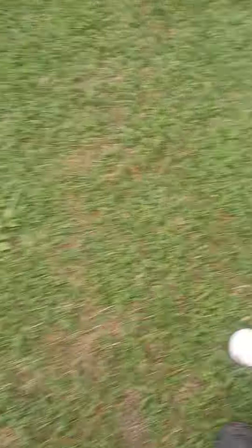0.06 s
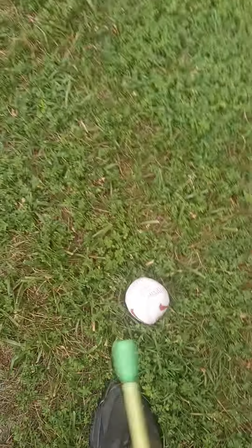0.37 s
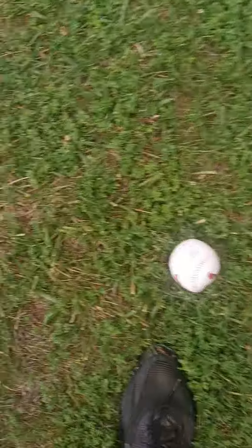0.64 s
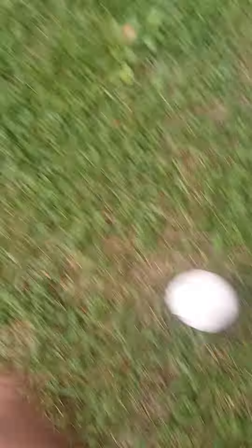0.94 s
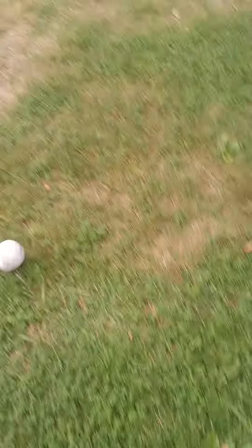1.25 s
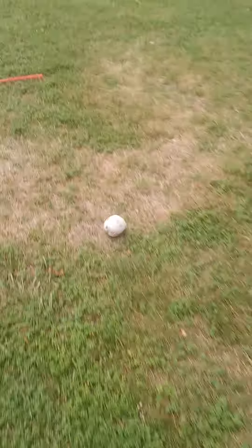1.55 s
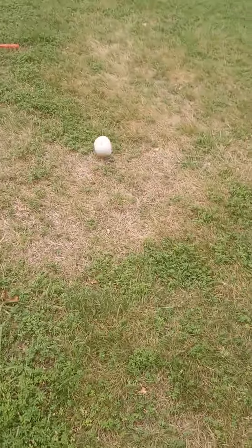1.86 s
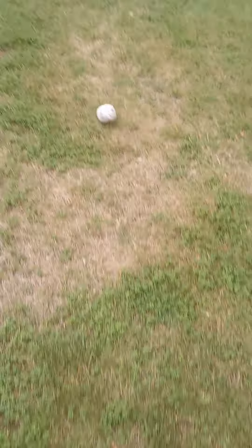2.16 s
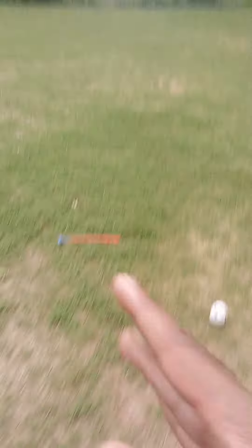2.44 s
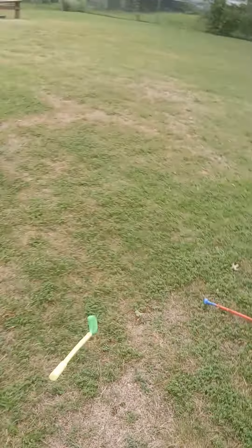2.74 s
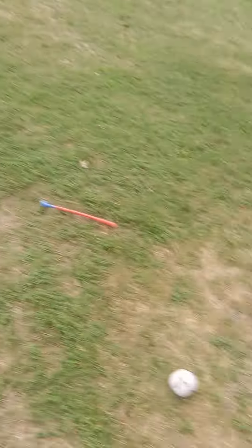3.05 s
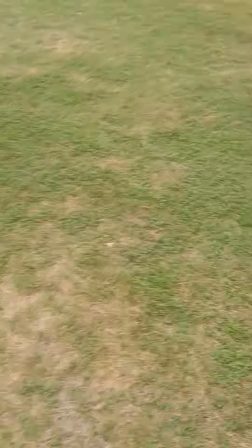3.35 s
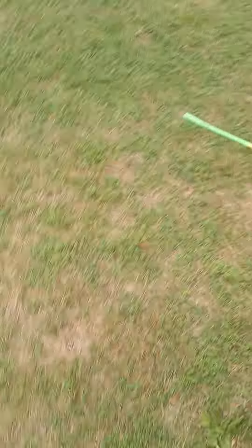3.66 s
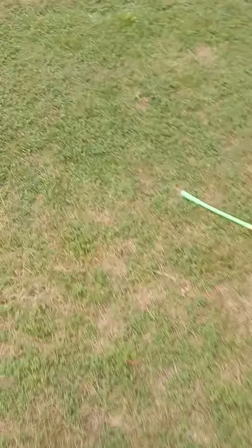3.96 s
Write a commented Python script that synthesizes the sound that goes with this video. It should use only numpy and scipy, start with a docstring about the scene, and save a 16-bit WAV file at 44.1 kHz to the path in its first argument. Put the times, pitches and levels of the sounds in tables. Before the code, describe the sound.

A hollow plastic toy club strikes a ball with a sharp click and a dull knock at about 1 second. Birds whistle and chirp for most of the first three seconds, over a thin insect hiss and low rumble. Soft steps crush the grass, with tiny snaps just after 2 seconds. The club drops with a soft thud at 3 seconds, and wind buffets the microphone around 3.5 seconds.

```python
"""Toy club on a lawn

A hollow plastic toy club swishes through grass, clicks against a ball and later drops on the lawn.
Soft steps crush the grass while songbirds whistle and chip among echoing trees, over a thin insect hiss.
A low rumble runs throughout, and near the end puffs of wind buffet the microphone."""
import sys
import numpy as np
from scipy import signal
from scipy.fft import rfft, irfft, next_fast_len
from scipy.io import wavfile
from scipy.ndimage import uniform_filter1d, map_coordinates

SR = 44100
rng = np.random.default_rng(int(sys.argv[2]) if len(sys.argv) > 2 else 0)


def wav_record(signal):
    """Record a signal, one row per channel, as 16-bit PCM in the file named by sys.argv[1]."""
    frames = np.transpose(np.atleast_2d(signal))
    bounded = np.clip(frames, -1, 1)
    # unit amplitude maps onto the largest positive 16-bit level
    quanta = np.round(bounded * 32767).astype(np.int16)
    wavfile.write(sys.argv[1], SR, quanta)


N = 176400
PATCH_DB = 2.5  # how much the tone of a noise drifts
CLICK_RISE_S = 0.0003


def amp(db):
    """Turn decibels into a gain."""
    return 10 ** (np.asarray(db) / 20)


def unit(x):
    """Scale a signal to an average power of 1."""
    return x / np.sqrt(np.mean(x ** 2) + 1e-20)


def clock(samples=N):
    """The time of each sample, in seconds."""
    return np.arange(samples) / SR


def along(points, hz):
    """Read between (frequency, value) points, spacing the pitches by octaves."""
    f, v = np.transpose(points)
    return np.interp(np.log(hz + 1), np.log(f + 1), v)


def wobble(rate):
    """A smooth random curve through `rate` new values a second."""
    return map_coordinates(rng.standard_normal(int(N * rate / SR) + 4), [np.arange(N) * rate / SR])


def filtered(x, response):
    """Turn each frequency up or down by the gain response(hz)."""
    size = next_fast_len(N + SR // 2)
    return irfft(rfft(x, size) * response(np.fft.rfftfreq(size, 1 / SR)), size)[:N]


def noise(colour, grain_db=0, patchy_db=0):
    """Noise with a colour (its balance of low and high), clumped into grains and drifting patches."""
    grains = amp(grain_db * np.clip(wobble(900), -2, 2))
    spectrum = signal.stft(rng.standard_normal(N) * grains, nperseg=512)[2]
    patches = uniform_filter1d(rng.standard_normal(spectrum.shape), size=3, axis=0)
    patches = uniform_filter1d(patches, size=14, axis=1)
    patchy = signal.istft(spectrum * amp(patchy_db * unit(patches)), nperseg=512)[1][:N]
    return unit(filtered(patchy, lambda hz: amp(along(colour, hz))))


def swells(rows):
    """A loudness curve that rises, holds and falls once for each row."""
    t = clock()
    return sum(amp(db) * np.exp(np.minimum(t - s, 0) / rise - np.maximum(t - s - hold, 0) / fall)
               for s, db, rise, hold, fall in rows)


def fade(t, ring_s):
    """Die away by 60 dB in ring_s seconds, the ring time."""
    return np.exp(-np.log(1000) * t / ring_s)


def ring(t, hz, ring_s):
    """One pure tone dying away."""
    return np.sin(2 * np.pi * hz * t) * fade(t, ring_s)


def add(track, s, sound):
    """Mix a sound into the track at s seconds."""
    i = round(s * SR)
    sound, i = sound[max(-i, 0):], max(i, 0)
    track[i:i + len(sound)] += sound[:N - i]


def thuds(rows, rise_s=0.0026):
    """Low pushes that die within a few vibrations."""
    out, t = np.zeros(N), clock(SR // 5)
    for s, db, hz, ring_s in rows:
        add(out, s, amp(db) * ring(t, hz, ring_s) * (1 - np.exp(-t / rise_s)))
    return out


# how long the trees echo: f/Hz, ring/s
TREES = [(300, 0.2), (2000, 0.43), (6000, 0.22), (12000, 0.22)]
def outdoors(x, echo_db, trunks=8, build_s=.018, spread_s=.11):
    """A sound with its echo from the trees: bounces off a few trunks and a blurred tail."""
    hz, t, spectrum = signal.stft(rng.standard_normal(SR // 2), SR, nperseg=256)
    envelope = fade(t, along(TREES, hz)[:, None]) * (1 - np.exp(-t / build_s))
    tail = signal.istft(spectrum * envelope, SR, nperseg=256)[1]
    tail /= np.linalg.norm(tail)
    delays = build_s + spread_s * rng.random(trunks)
    tail[(delays * SR).astype(int)] += rng.choice([-1, 1], trunks) / np.sqrt(trunks)
    return x + amp(echo_db) * signal.fftconvolve(x, tail / np.linalg.norm(tail))[:N]


# colour of still air: f/Hz, level/dB
AIR_COLOUR = [(200, -3), (300, 6.5), (640, -2.5), (1000, -1.5), (1550, -2.5), (2140, -6), (3500, -2.5),
              (4800, -25), (5850, 3.5), (8280, -23), (13400, -32), (15500, -14.5)]
def air(level_db=-64.5, drift_db=2):
    """Still air makes a faint, wavering hush."""
    return amp(level_db + drift_db * wobble(15)) * noise(AIR_COLOUR, patchy_db=PATCH_DB)


# rise and fall of the rumble: t/s, relative level/dB
RUMBLE_LEVELS = [(0, -44.5), (0.45, -46), (0.65, -47.5), (1.0, -45), (1.3, -42), (1.7, -46.5), (2.3, -46),
                 (2.6, -51.5), (2.88, -50), (3.05, -42.5), (3.4, -41)]
# its colour: f/Hz, level/dB
RUMBLE_COLOUR = [(20, -19), (40, -8), (62, -2.5), (90, 5.5), (140, 5), (200, -7), (290, -21), (420, -40.5),
                 (600, -57), (1000, -69)]
def rumble(trim_db=-0.5, calm_s=3.8, calm_db=-6.5):
    """A low outdoor rumble that drops once the wind has passed."""
    t = clock()
    calm = np.clip((t - calm_s) / 0.0084, 0, 1)
    level_db = np.interp(t, *np.transpose(RUMBLE_LEVELS)) + trim_db + calm_db * calm
    return amp(level_db + 2.57 * wobble(20)) * noise(RUMBLE_COLOUR)


# the drone's swell: t/s, level/dB, rise/s, hold/s, fall/s
DRONE = [(2.17, -62.5, 0.052, 0.48, 0.31)]
# its colour: f/Hz, level/dB
DRONE_COLOUR = [(150, -16.5), (260, 10.5), (340, 6), (430, -4), (600, -27.5), (1000, -53)]
def drone():
    """A faint low drone swells and fades once."""
    return swells(DRONE) * noise(DRONE_COLOUR, patchy_db=PATCH_DB)


# rise and fall of insects and far birds together: t/s, relative level/dB
WILDLIFE_LEVELS = [(0.0, -54.5), (0.24, -60.5), (0.43, -61), (0.86, -55), (1.06, -54), (1.5, -48.5),
                   (1.82, -52), (2.16, -51), (2.67, -52), (2.81, -57), (3.05, -57), (3.24, -69.5),
                   (3.5, -66), (4.0, -60)]
# their colour: f/Hz, level/dB
WILDLIFE_COLOUR = [(3000, -53), (3700, -11), (4300, -2.5), (5000, -8), (5800, 2.5), (6600, -2.5),
                   (7200, -21.5), (8200, -34), (11000, -49)]
def insects(trim_db=-4.5, flicker_db=1.6):
    """Insects make a thin, flickering hiss."""
    level_db = np.interp(clock(), *np.transpose(WILDLIFE_LEVELS)) + trim_db + flicker_db * wobble(29.79)
    return amp(level_db) * noise(WILDLIFE_COLOUR, grain_db=3.5, patchy_db=PATCH_DB)


def chorus(count=140, trim_db=-6, typical_note_s=.026, low_hz=3960, high_hz=6780, glide_hz=900):
    """Far birds twitter at random, each tiny note sliding up or down."""
    notes = np.zeros(N)
    for when, pitch, length, glide, strength in rng.random((count, 5)):
        progress = np.linspace(0, 1, int((.5 + length) * typical_note_s * SR))
        hz = low_hz + pitch * (high_hz - low_hz) + glide_hz * (2 * glide - 1) * progress
        envelope = (.5 + strength) * np.sin(np.pi * progress)
        add(notes, when * N / SR, envelope * np.sin(2 * np.pi * np.cumsum(hz) / SR))
    twitter = filtered(outdoors(notes, echo_db=-0.5), lambda hz: amp(along(WILDLIFE_COLOUR, hz)))
    level_db = np.interp(clock(), *np.transpose(WILDLIFE_LEVELS)) + trim_db
    return amp(level_db) * unit(twitter)


# faint calls: t/s, level/dB, rise/s, hold/s, fall/s
FAR_CALLS = [(1.172, -56.5, 0.004, 0.012, 0.09), (1.62, -71, 0.025, 0.045, 0.019),
             (2.36, -69, 0.055, 0.033, 0.24), (2.77, -61.5, 0.024, 0.049, 0.083)]
# their colour: f/Hz, level/dB
FAR_CALL_COLOUR = [(800, -32), (1250, 0.5), (1500, 24), (1850, 25.5), (2400, -51), (3200, -41)]
def far_calls():
    """Distant bird calls, heard as swells of narrow noise."""
    return swells(FAR_CALLS) * noise(FAR_CALL_COLOUR, patchy_db=2 * PATCH_DB)


FLUTTER_PER_S = 170  # how fast the loudness of a bird's note trembles
# chips and rising notes: t/s, length/s, start f/Hz, end f/Hz, level/dB, buzz depth/Hz
CHIPS = [(0.348, 0.043, 4340, 4530, -48.5, 37.6), (0.544, 0.012, 4620, 5730, -41.5, 605),
         (0.552, 0.016, 5720, 4250, -45, 500), (0.638, 0.028, 5540, 5550, -44, 427),
         (0.657, 0.018, 6090, 6150, -42.5, 660), (0.706, 0.012, 5490, 5430, -38.5, 432),
         (0.712, 0.016, 4850, 4220, -46, 470), (0.807, 0.036, 6730, 6500, -42.5, 200),
         (0.867, 0.027, 5700, 4790, -44, 740), (0.874, 0.036, 6400, 6360, -46, 430),
         (1.038, 0.023, 4630, 4570, -46.5, 500), (1.035, 0.035, 5500, 6530, -42, 402),
         (1.1, 0.0197, 5600, 4500, -46.5, 586), (1.151, 0.013, 6880, 6900, -49.5, 190),
         (1.721, 0.013, 7030, 5060, -42.5, 507), (1.845, 0.019, 5040, 4360, -46.5, 170),
         (1.902, 0.023, 6700, 6870, -53, 150), (2.106, 0.074, 4300, 4750, -45.5, 65.7),
         (2.298, 0.039, 5800, 5230, -44, 606), (2.186, 0.039, 4500, 4750, -52, 69.5),
         (2.442, .055, 3350, 4140, -49, 160), (2.478, 0.072, 4270, 4470, -50, 90),
         (2.635, 0.09, 5870, 5100, -45, 640), (2.261, 0.047, 2935, 2450, -55, 152),
         (3.692, 0.028, 5700, 5670, -50.5, 360)]
def chips(buzz_per_s=800, flutter_db=4):
    """Birds chip in short slides, roughened by a quick buzz in pitch and loudness."""
    out = np.zeros(N)
    for s, length, start_hz, end_hz, db, buzz_hz in CHIPS:
        n = int(length * SR)
        progress = np.linspace(0, 1, n)
        hz = start_hz + (end_hz - start_hz) * np.sin(progress * np.pi / 2)
        hz += buzz_hz * np.tanh(wobble(buzz_per_s)[:n])
        flutter = unit(amp(flutter_db * np.tanh(wobble(FLUTTER_PER_S)[:n])))
        tone = np.sin(2 * np.pi * np.cumsum(hz) / SR)
        add(out, s, amp(db) * flutter * np.sin(np.pi * progress) * tone)
    return out


def whistles(rows, shape, warble, settle_s=.012, flutter_db=3, resonance_hz=7580, width_hz=330):
    """Notes that start with a rough warble (a share of the pitch), drop fast, then level off and fade."""
    times, pitch, level = np.transpose(shape)
    out, t = np.zeros(N), clock(int(times[-1] * SR))
    envelope = amp(np.interp(t, times, level)) * signal.windows.tukey(len(t), .07)
    depth = warble * (.15 + np.exp(-t / settle_s))
    for s, db in rows:
        hz = np.interp(t, times, pitch) * (1 + depth * wobble(600)[:len(t)])
        phase = 2 * np.pi * np.cumsum(hz) / SR
        # a tone at four times the pitch flashes as it slides through a resonance
        overtone = amp(-6.5) * np.exp(-((4 * hz - resonance_hz) / width_hz) ** 2) * np.sin(4 * phase)
        flutter = amp(flutter_db * wobble(FLUTTER_PER_S)[:len(t)])
        add(out, s, amp(db) * envelope * flutter * (np.sin(phase) + overtone))
    return out


# the notes of a low, a high and a far singer: t/s, level/dB
LOW_SONG = [(-0.011, -39.5), (0.229, -40), (0.464, -38.5), (0.704, -40), (0.942, -42)]
HIGH_SONG = [(1.200, -43), (1.391, -43), (1.581, -41.5), (1.769, -42), (1.966, -46)]
FAR_SONG = [(2.236, -46.5), (2.578, -51.5)]
# the path of one note of each, from its start: t/s, f/Hz, relative level/dB
LOW_NOTE = [(0, 2980, -7), (.012, 2480, 1), (.023, 2190, -1), (.036, 1890, -10), (.052, 1690, -12),
            (.08, 1380, -19), (.14, 1120, -27)]
HIGH_NOTE = [(0, 6900, -6), (.005, 5900, 1), (.01, 4800, -2), (.022, 4490, 0), (.036, 4290, -2),
             (.065, 4050, -14)]
FAR_NOTE = [(0, 7000, -3), (.012, 5950, 1), (.026, 5300, -1), (.05, 4900, -5), (.075, 4600, -11)]
def songbirds():
    """Birds sing among the trees; the farther the singer, the more echo."""
    return (outdoors(whistles(LOW_SONG, LOW_NOTE, warble=.005), echo_db=-10)
            + outdoors(whistles(HIGH_SONG, HIGH_NOTE, warble=.05), echo_db=-10)
            + outdoors(whistles(FAR_SONG, FAR_NOTE, warble=.04), echo_db=3)
            + outdoors(chips(), echo_db=-4))


# puffs of wind: t/s, level/dB, rise/s, hold/s, fall/s, top f/Hz
PUFFS = [(3.246, -39, 0.004, 0.012, 0.0091, 260), (3.441, -24, 0.01, 0.028, 0.02, 700),
         (3.512, -25.5, .008, 0.047, 0.006, 700), (3.572, -24.5, .004, .032, .022, 380),
         (3.659, -34, 0.003, 0.009, 0.003, 230), (3.768, -38.5, 0.004, 0.01, 0.01, 220)]
# their colour: f/Hz, level/dB
PUFF_COLOUR = [(20, -18.5), (50, -6.5), (85, 5.5), (115, 1.5), (150, 3.5), (260, -4), (400, -14),
               (600, -23), (900, -42.5), (1400, -71)]
# the sharpest bumps of air: t/s, level/dB, f/Hz, ring/s
BUFFETS = [(3.4372, -14, 240, 0.022), (3.4935, -10, 320, 0.012), (3.508, -15, 205, 0.026),
           (3.5485, -13, 190, 0.025)]
def wind(buffet_top_hz=760):
    """Swirling air buffets the microphone; the weaker puffs are duller."""
    swirls = noise(PUFF_COLOUR) * amp(1.5 * wobble(80))
    puffs = sum(filtered(swells([puff]) * swirls, lambda hz: 1 / (1 + (hz / top_hz) ** 4))
                for *puff, top_hz in PUFFS)
    muffle = signal.butter(4, buffet_top_hz, fs=SR, output='sos')
    return puffs + signal.sosfilt(muffle, thuds(BUFFETS))


# footsteps: t/s, level/dB, rise/s, hold/s, fall/s, crunch f/Hz
STEPS = [(0.163, -52.5, 0.071, 0.021, 0.027, 1380), (0.457, -56, 0.051, 0.093, 0.022, 1830),
         (1.26, -46.5, 0.029, 0.033, 0.036, 1870), (1.486, -48.5, 0.03, 0.03, 0.061, 1240),
         (2.05, -51.5, 0.025, 0.089, 0.05, 1660), (2.368, -56.5, 0.12, 0.018, 0.17, 1350),
         (2.81, -59, 0.12, 0.027, 0.019, 1520), (3.34, -52.5, 0.05, 0.057, 0.038, 1020)]
# colours of their rustle and crackle: f/Hz, level/dB
RUSTLE_COLOUR = [(200, -24), (600, -8.5), (950, -7), (1600, 0.5), (2300, -6), (2800, 3), (3500, -2.5),
                 (4200, 2), (6200, 9.5), (7200, 0), (8300, -23.5), (13000, -27), (15300, -11)]
CRACKLE_COLOUR = [(4000, -38), (6500, 6.5), (8500, 1), (11000, -8.5), (13000, -14), (15300, -11.5)]
def steps(crunch_db=-9.5, crunch_width_hz=580, crackle_db=12, crispness=1.64):
    """Grass crushes under each shoe with a crunch of its own pitch; harder steps crackle more."""
    uneven = amp(1.8 * wobble(70))
    weight, crunch = np.zeros(N), np.zeros(N)
    for *press, hz in STEPS:
        load = swells([press]) * uneven
        grains = rng.standard_normal(N) * amp(4 * np.clip(wobble(300), -2, 2))
        crunch += load * unit(filtered(grains, lambda f: 1 / (1 + ((f - hz) / crunch_width_hz) ** 2) ** 2))
        weight += load
    crackle = weight ** crispness * noise(CRACKLE_COLOUR, grain_db=9)
    rustle = weight * noise(RUSTLE_COLOUR, grain_db=-0.5, patchy_db=3.5)
    return rustle + amp(crunch_db) * crunch + amp(crackle_db) * crackle


# breaking stalks: t/s, level/dB
SNAPS = [(2.026, -21), (2.283, -24)]
def stalks(hz=5630, ring_s=0.0033):
    """Dry stalks snap underfoot with a tiny high tick."""
    out, t = np.zeros(N), clock(SR // 100)
    tick = ring(t, hz, ring_s) * (1 - np.exp(-t / CLICK_RISE_S)) ** 2
    for s, db in SNAPS:
        add(out, s, amp(db) * tick)
    return out


# thuds of ball and turf: t/s, level/dB, f/Hz, ring/s
THUDS = [(0.9513, -8, 218, 0.017), (3.0058, -16, 172, 0.028)]
def ball_and_turf(knock_db=-11):
    """Ball and turf thud dully; the first thud carries a higher knock."""
    out = thuds(THUDS)
    s, db = THUDS[0][:2]
    add(out, s, -amp(db + knock_db) * ring(clock(SR // 5), hz=643, ring_s=0.0084))
    return out


# tones of the shaft: f/Hz, relative level/dB, free ring/s
SHAFT_TONES = [(897, -5.5, 0.057), (1380, -8.5, 0.029), (1475, 1, 0.089), (1520, -8, 0.07), (1650, -3, .05),
               (1850, -12.5, 0.058), (3060, -9.5, 0.11)]
def shaft(t, ring_share, rise_s=0.00083):
    """The hollow shaft rings, with a slightly different mix of tones at every knock."""
    tones = sum(amp(db + rng.normal(0, 3.1)) * ring(t, hz, ring_s * ring_share)
                for hz, db, ring_s in SHAFT_TONES)
    return tones * (1 - np.exp(-t / rise_s))


# tones of the club's face: f/Hz, relative level/dB, ring as a multiple of the click's
FACE_TONES = [(1550, -48, 1.8), (2180, -15.5, 2.5), (2840, -15, 1.75), (3900, -14, 1), (4760, -13, 2.4),
              (5800, -9.5, 3.1), (6240, 0, 0.91), (6600, -11, 1), (9940, -23, 1.8)]
def face(t, ring_s, crack_db=-25.5, crack_s=0.013):
    """The hard plastic face clicks: short bright tones and a crack of noise."""
    tones = sum(amp(db + rng.normal(0, 1)) * ring(t, hz, ring_s * times) for hz, db, times in FACE_TONES)
    crack = amp(crack_db) * rng.standard_normal(len(t)) * fade(t, crack_s)
    return (tones + crack) * (1 - np.exp(-t / CLICK_RISE_S))


# clicks of the club: t/s, face level/dB, face ring/s, shaft level/dB
CLICKS = [(0.9351, -24, .005, -38), (0.9387, -9.5, .003, -47), (0.9516, -9, .0038, -52),
          (0.9762, -18.5, .005, -35), (0.9811, -22, .007, -37)]
# the dropped club lands: t/s, level/dB
LANDINGS = [(2.9855, -41), (2.994, -45), (3.001, -43)]
# scrapes through the grass: t/s, level/dB, rise/s, hold/s, fall/s
SCRAPES = [(0.9455, -37, 0.002, 0.006, 0.0024), (0.970, -42.5, 0.003, 0.014, 0.042),
           (2.984, -44, 0.0035, 0.016, .012), (3.001, -38.5, .002, .003, .002)]
# their colour: f/Hz, level/dB
SCRAPE_COLOUR = [(290, -19), (500, -18), (781, 1), (997, -14), (1450, 5), (1900, 1.5), (2600, -10),
                 (3060, 1), (3630, -3.5), (6640, 2.5), (8980, -26), (13400, -23.5), (15500, -11.5)]
def club():
    """The club scrapes through grass and hits the ball, then later drops and rings freely."""
    knocks, t = np.zeros(N), clock(SR // 5)
    for s, face_db, ring_s, shaft_db in CLICKS:
        add(knocks, s, amp(face_db) * face(t, ring_s))
        add(knocks, s, amp(shaft_db) * shaft(t, ring_share=0.38))  # a hand shortens the ring
    for s, db in LANDINGS:
        add(knocks, s, amp(db) * shaft(t, ring_share=1))
    scrapes = swells(SCRAPES) * noise(SCRAPE_COLOUR, grain_db=3)
    return outdoors(knocks + scrapes, echo_db=-26)


def scene():
    """Everything on the lawn, in one channel."""
    player = club() + ball_and_turf() + steps() + stalks()
    background = songbirds() + far_calls() + insects() + air() + chorus() + rumble() + drone()
    return (player + background + wind())[None]


def record(dry, low_cut_hz=60.5, top_hz=15850):
    """The microphone sheds the deepest bass, and the very highest treble is cut off."""
    bass_cut = signal.butter(2, low_cut_hz, 'highpass', fs=SR, output='sos')
    return filtered(signal.sosfilt(bass_cut, dry[0]), lambda hz: hz < top_hz)[None]


dry = scene()
out = record(dry)
wav_record(out)
```